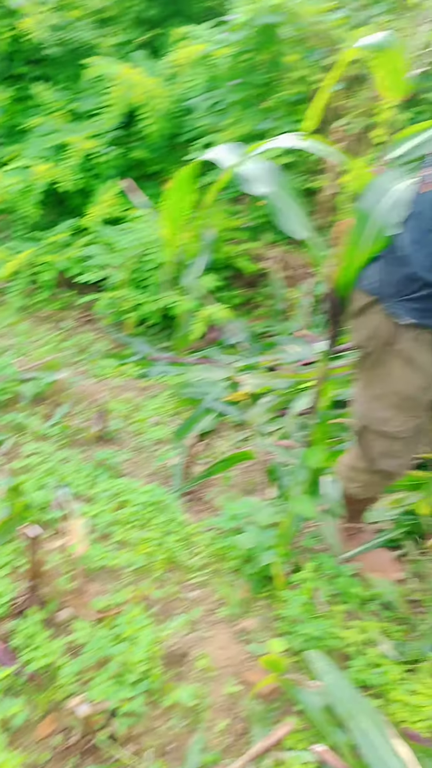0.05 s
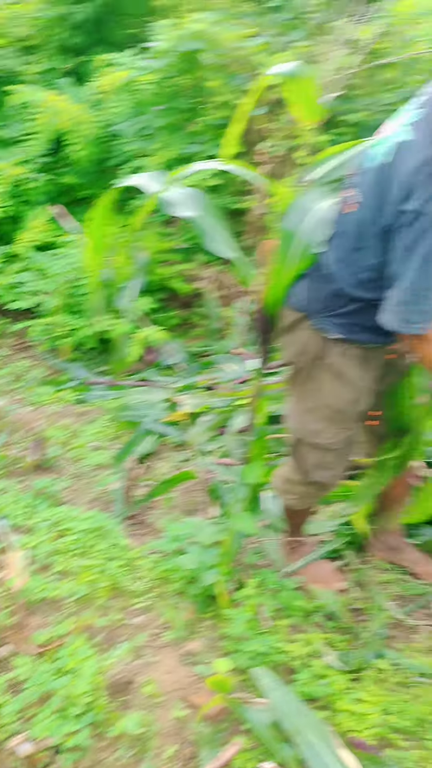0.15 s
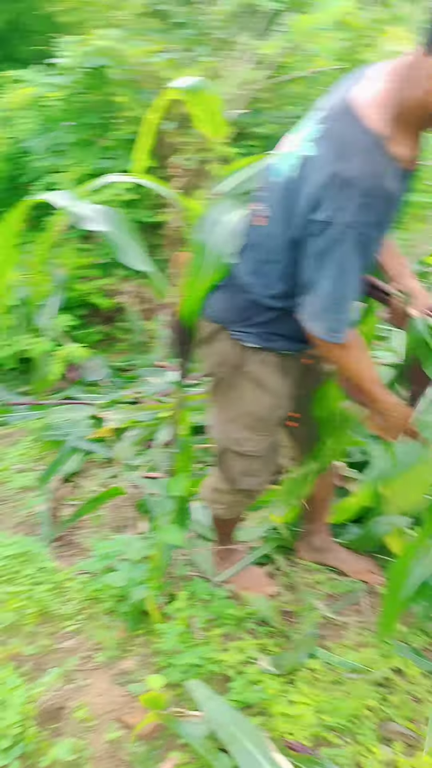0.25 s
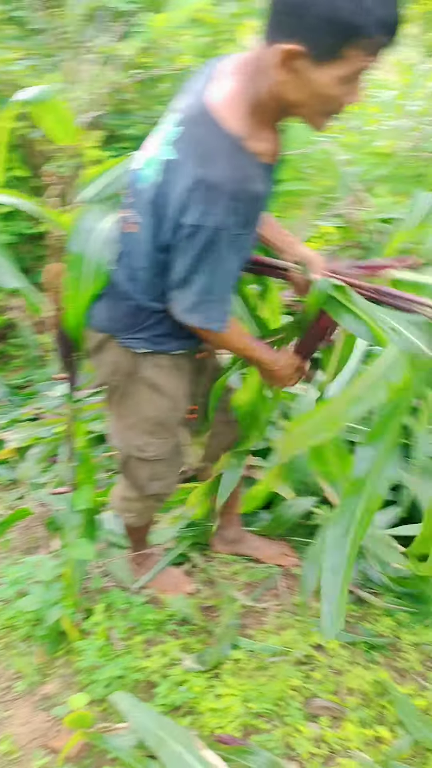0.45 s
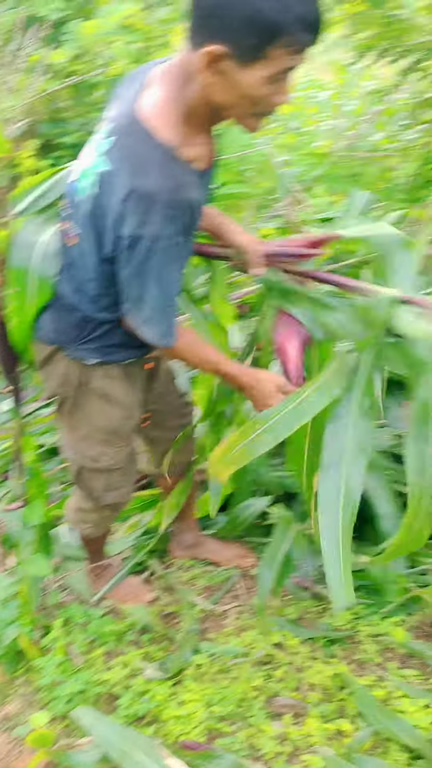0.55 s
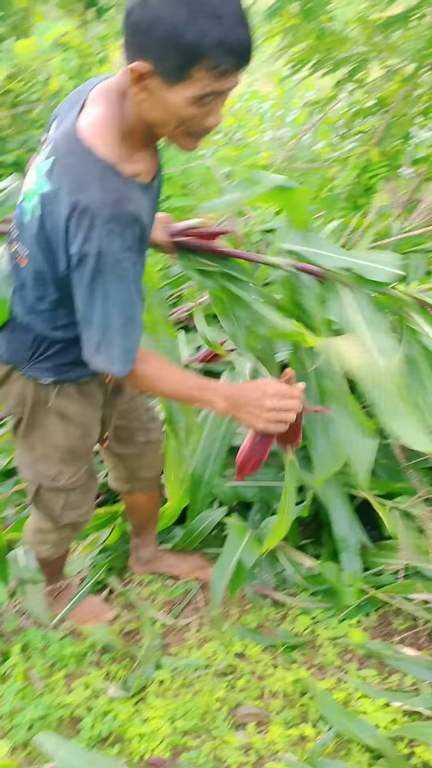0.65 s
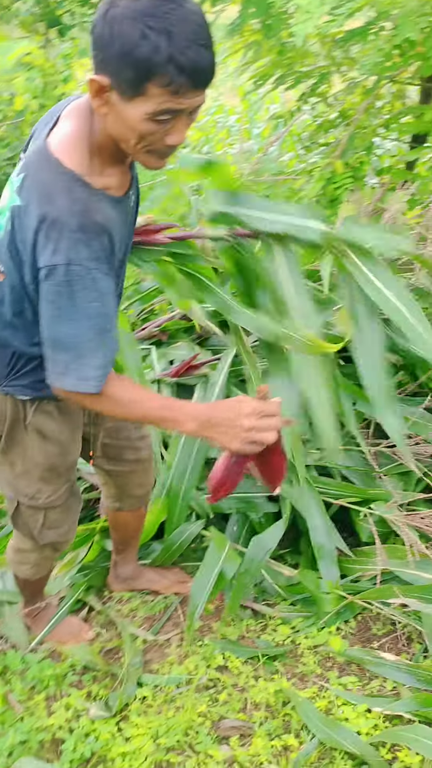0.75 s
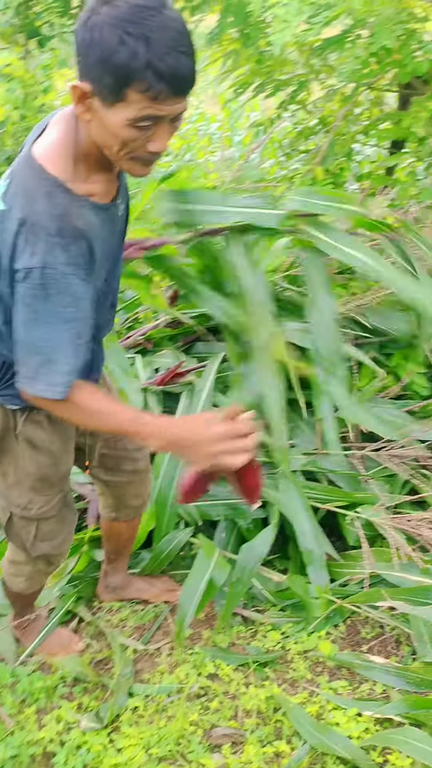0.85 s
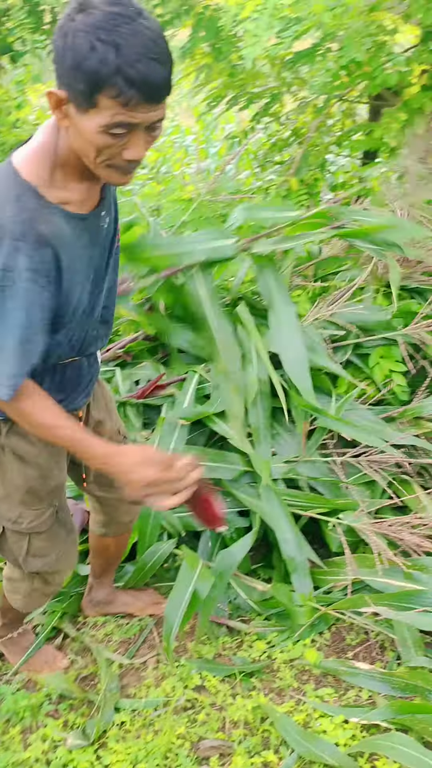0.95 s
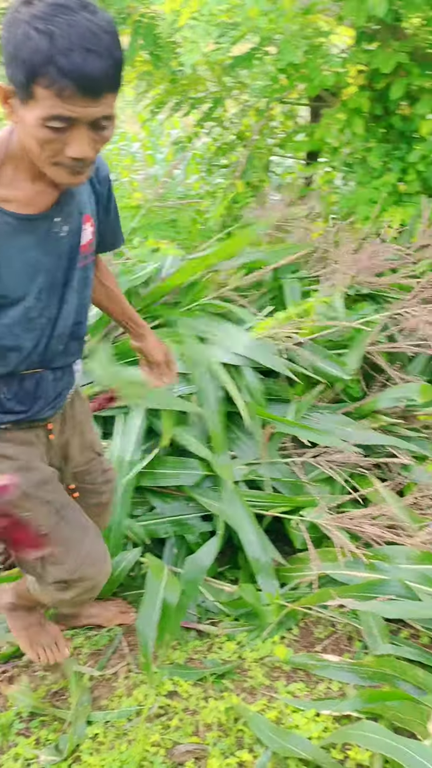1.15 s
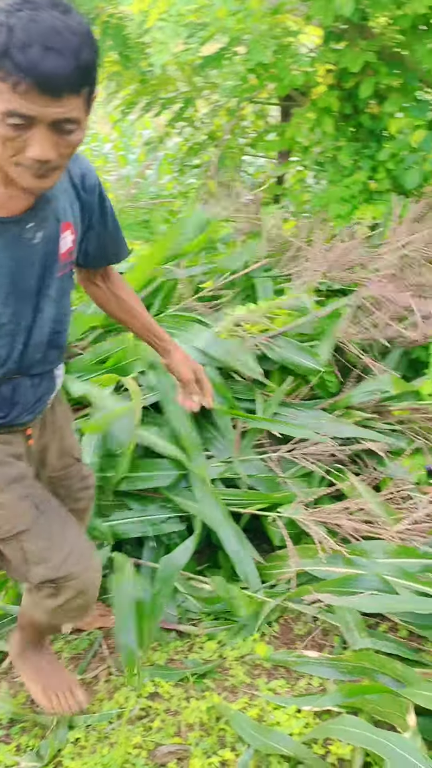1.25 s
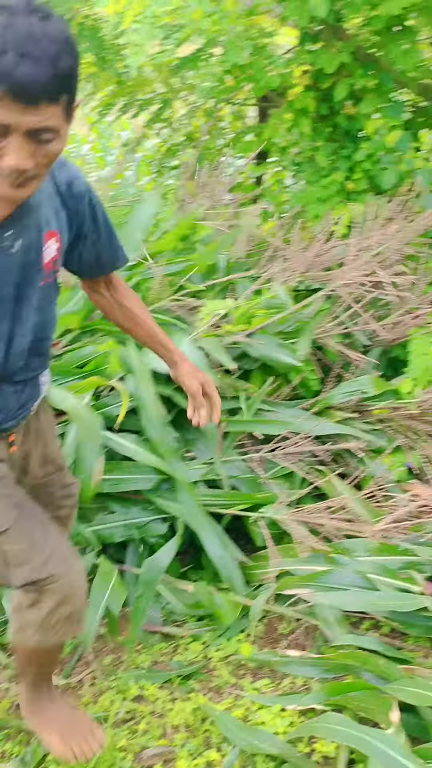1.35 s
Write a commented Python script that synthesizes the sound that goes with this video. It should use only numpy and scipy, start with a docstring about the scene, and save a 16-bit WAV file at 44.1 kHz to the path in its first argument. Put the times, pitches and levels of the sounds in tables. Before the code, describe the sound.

In an open field, a corn stalk snaps twice in quick succession and husk fibres rip. Leaves swish and crackle in uneven waves with light bumps, and a bare foot lands softly on soil near the end.

```python
"""Picking corn by hand

An ear breaks off its stalk with a double snap and the husk fibres tear. The leafy stalk is swung and
dropped on a heap: its leaves hiss by friction, crinkle by buckling and tick as their ribs collide.
Bare feet land on the soil. Faint hiss of the open field lies behind, and the microphone passes
little above 8 kHz."""
import sys
import numpy as np
from scipy import signal
from scipy.fft import rfft, irfft, next_fast_len
from scipy.io import wavfile
from scipy.ndimage import map_coordinates

SR = 44100
rng = np.random.default_rng(int(sys.argv[2]) if len(sys.argv) > 2 else 0)


def put_to_file(sound):
    """Save the sound as 16-bit audio at rate SR, in the file named by the first command-line argument."""
    columns = np.atleast_2d(sound).T  # one column per channel
    safe = np.clip(columns, -1, 1)
    whole_steps = np.round(safe * 32767)
    wavfile.write(sys.argv[1], SR, whole_steps.astype(np.int16))


N = 61739
T = np.arange(N) / SR
TOP_HZ = 8520


def amp(db):
    """Amplitude ratio of a level in decibels."""
    return 10 ** (np.asarray(db) / 20)


def unit(x):
    """Normalisation to rms 1."""
    return x / np.sqrt(np.mean(x ** 2) + 1e-20)


def filtered(x, response):
    """Linear filtering: the spectrum of x is multiplied by a frequency response."""
    size = next_fast_len(N + 8192)
    return irfft(rfft(x, size) * response(np.fft.rfftfreq(size, 1 / SR)), size)[:N]


def coloured(x, spectrum):
    """Spectral shaping by a curve of (f/Hz, level/dB) points, cut off at TOP_HZ."""
    f, db = np.transpose(spectrum)
    return filtered(x, lambda hz: amp(np.interp(np.log(hz + 1), np.log(f), db)) * (hz < TOP_HZ))


def noise(spectrum):
    """Spectrally shaped Gaussian noise of rms 1."""
    return unit(coloured(rng.standard_normal(N), spectrum))


def resonance(centre_hz, width_oct, skirt_db):
    """A broad resonance: wandering phase at nearly even amplitude gives a rough ring of rms 1."""
    def shape(hz):
        octaves = np.log2((hz + 1) / centre_hz)
        peak = np.exp(-.5 * (octaves / width_oct) ** 2)
        skirt = amp(skirt_db) * np.exp(-.5 * (octaves / 1.6) ** 2)
        return (peak + skirt) * (hz < TOP_HZ)
    band = filtered(rng.standard_normal(N), shape)
    phase = np.angle(signal.hilbert(band, next_fast_len(N))[:N])
    return unit(filtered(np.cos(phase), lambda hz: np.sqrt(shape(hz))))


def burst(start_s, attack_s, decay_s):
    """Envelope of a damped transient: quick rise, exponential decay."""
    t = np.maximum(T - start_s, 0)
    return (1 - np.exp(-t / attack_s)) * np.exp(-t / decay_s)


def grains(per_s, centre_hz, spread, cycles, scatter_db):
    """Shot noise of rms 1: tiny damped oscillations of random onset, frequency and size."""
    onset, pitch_a, pitch_b, chance = rng.random((int(per_s * N / SR), 4)).T[:, :, None]
    hz = np.clip(centre_hz * np.exp(spread * (pitch_a + pitch_b - 1)), 40, TOP_HZ)
    size = amp(-scatter_db * np.log(np.maximum(chance, np.exp(-4))))
    age = np.arange(SR // 100)
    rings = size * np.sin(2 * np.pi * hz * age / SR) * np.exp(-hz * age / SR / cycles)
    at = (onset * N).astype(int) + age
    return unit(np.bincount(at.ravel(), rings.ravel(), N)[:N])


# Spectrum of the field's background: f/Hz, level/dB
FIELD_SPECTRUM = [(25, -12), (70, -15), (125, 4.5), (240, -11.5), (550, 2), (900, -2.5), (1400, -3),
                  (2400, 5), (4500, -4.5), (6500, -10.5), (8000, -15.5)]

def field_hiss():
    """Ambient noise: a faint, stationary broadband floor."""
    return amp(-53) * noise(FIELD_SPECTRUM)


# Spectrum of leaf friction: f/Hz, level/dB
SLIDE_SPECTRUM = [(500, -33), (2000, -16.5), (3000, -6), (3900, -6.5), (4900, -6), (5700, -2.5), (6500, 1),
                  (7400, -4.5), (8200, -4)]

def sliding():
    """Friction: dense tiny slips of leaf on leaf merge into a hiss."""
    slips = grains(per_s=3500, centre_hz=5650, spread=0.77, cycles=1.3, scatter_db=0)
    return unit(unit(coloured(slips, SLIDE_SPECTRUM)) + noise(SLIDE_SPECTRUM))


# Spectrum of buckling leaves: f/Hz, level/dB
CRINKLE_SPECTRUM = [(200, -39.5), (700, -10.5), (1150, -5.5), (1600, -1), (1900, -2.5), (2300, 0.5),
                    (2900, 0), (3700, -5.5), (6000, -21)]

def crinkling():
    """Buckling: leaves give way in small clicks over a bed of noise."""
    clicks = grains(per_s=900, centre_hz=2254, spread=0.907, cycles=1.9, scatter_db=3.5)
    return unit(unit(coloured(clicks, CRINKLE_SPECTRUM)) + amp(3.5) * noise(CRINKLE_SPECTRUM))


# Spectrum of flapping leaves: f/Hz, level/dB
FLAP_SPECTRUM = [(25, -33.5), (60, -18), (90, -9.5), (130, -3), (190, -5), (320, -2.5), (600, -3.5),
                 (1000, -4.5), (2000, -19.5)]

def flapping():
    """Radiation from moving surfaces: flapping leaves give low pats and noise."""
    pats = grains(per_s=250, centre_hz=449, spread=1.25, cycles=1.8, scatter_db=4)
    return unit(unit(coloured(pats, FLAP_SPECTRUM)) + noise(FLAP_SPECTRUM))


# Course of the leaf movement: t/s, hiss level/dB, crinkle level/dB
LEAF_MOTION = [(0, -48, -52), (.16, -49, -48), (0.209, -43, -47), (0.258, -33.5, -34.5),
               (0.309, -42.5, -47), (0.348, -39, -37), (0.419, -44, -53), (0.478, -37, -38),
               (.56, -37, -42), (0.661, -44.5, -44.5), (.705, -49, -54.5), (0.734, -40, -42.5),
               (0.862, -37, -41.5), (.97, -42, -45), (1.04, -41, -42), (1.13, -37, -40), (1.2, -34, -38),
               (1.291, -44, -45.5), (1.39, -50, -56.5)]
FLAP_DB, FLAP_FOLLOWS_CRINKLE = -54, 0.83
CATCH_DB, CATCH_KNOTS_PER_S = 1.21, 110

def leaves():
    """Stick-slip modulation: the three leaf sounds waver together as the leaves catch and slip."""
    times, hiss_db, crinkle_db = np.transpose(LEAF_MOTION)
    hiss_db, crinkle_db = np.interp(T, times, hiss_db), np.interp(T, times, crinkle_db)
    flap_db = FLAP_DB + FLAP_FOLLOWS_CRINKLE * (crinkle_db - crinkle_db.mean())
    catch = map_coordinates(rng.standard_normal(1024), [T * CATCH_KNOTS_PER_S], mode="wrap")
    rustle = amp(hiss_db) * sliding() + amp(crinkle_db) * crinkling() + amp(flap_db) * flapping()
    return amp(CATCH_DB * catch) * rustle


# Impacts of leaf ribs and husks: t/s, level/dB, f/Hz, decay time/s, width/octaves
RIB_TICKS = [(0.1741, -30.5, 2920, 0.0032, 0.27), (0.1745, -29.5, 6000, 0.0038, 0.095),
             (0.195, -38, 2600, 0.0012, .25), (.2775, -17, 2310, 0.0009, 0.23),
             (.2825, -21, 2570, .001, .25), (0.2915, -30, 2260, 0.0021, 0.22),
             (0.3096, -29.5, 2330, 0.0022, 0.13), (0.34, -26.5, 1720, 0.0041, 0.24),
             (0.3415, -29, 5840, 0.011, 0.95), (0.4682, -25.5, 5550, 0.0038, 0.8),
             (0.472, -23, 1760, 0.002, 0.22), (0.6269, -24.5, 2180, 0.0015, 1),
             (0.7935, -25.5, 1365, .0022, 0.26), (0.845, -29.5, 2700, 0.0033, 0.45),
             (.893, -25, 2360, .0015, 0.25), (1.0625, -28, 2255, 0.0048, 0.06),
             (1.067, -26.5, 4500, 0.0036, 0.8), (1.108, -29.5, 5900, 0.0036, 0.17),
             (1.161, -27.5, 5600, .003, 0.29)]

def ticks():
    """Impact excitation: stiff ribs and husks flick against each other and ring briefly."""
    return sum(amp(db) * burst(start, 0.00035, decay) * resonance(hz, width, skirt_db=-25)
               for start, db, hz, decay, width in RIB_TICKS)


# Bumps of stalk and ear: t/s, level/dB, f/Hz, decay time/s
STALK_KNOCKS = [(0.175, -35, 396, 0.0054), (.234, -27.5, 430, 0.0076), (0.237, -43, 140, .015),
                (0.489, -47.5, 292, 0.073), (0.536, -45.5, 134, 0.019), (0.757, -43, 1110, 0.0032),
                (0.842, -46.5, 700, 0.0071), (1.063, -40.5, 260, 0.0045), (1.182, -38, 400, 0.0039)]
KNOCK_HIGHPASS_HZ = 70

def knocks():
    """Heavy damping: stalk and ear recoil and bump with hardly any ring and no deep bass."""
    bumps = sum(amp(db) * burst(start, .001, decay) * resonance(hz, width_oct=0.63, skirt_db=-37)
                for start, db, hz, decay in STALK_KNOCKS)
    return filtered(bumps, lambda hz: hz ** 4 / (hz ** 4 + KNOCK_HIGHPASS_HZ ** 4))


# Breaks of the stalk: t/s, level/dB, f/Hz at the peak, rise time/s, relative splinter level/dB
STALK_BREAKS = [(.2206, -14, 2450, .0005, -11), (.2341, -5.3, 2400, .00075, -18.5)]
# Spectrum of splintering fibres: f/Hz, level/dB
SPLINTER_SPECTRUM = [(300, -24), (1100, -13.5), (1750, -2), (2300, 1), (2900, 1.5), (3700, -5.5),
                     (5000, -8.5), (6600, -4), (8000, -16.5)]
SNAP_RISE_HZ_PER_S = 330000

def snaps():
    """Brittle fracture: each break gives a rising ring of a few cycles, then a spray of splinters."""
    out = np.zeros(N)
    for start, db, hz, peak_s, splinter_db in STALK_BREAKS:
        t = np.maximum(T - start, 0)
        rise = t / peak_s
        turns = hz * t + SNAP_RISE_HZ_PER_S * (t / 2 - peak_s) * t
        ring = rise * np.exp((1 - rise ** 2) / 2) * np.sin(2 * np.pi * turns)
        spray = burst(start, 0.00021, 0.0036) + amp(1.5) * burst(start, 0.00065, 0.0049)
        out += amp(db) * (ring + amp(splinter_db) * spray * noise(SPLINTER_SPECTRUM))
    return out


# Spectrum of parting husk fibres: f/Hz, level/dB
HUSK_SPECTRUM = [(40, -36), (300, -15), (1100, -3.5), (1750, -3), (2800, -4), (4000, -7), (8000, -5)]
TEAR_START_S, TEAR_END_S, TEAR_RELEASE_S, TEAR_DB = .239, .271, .009, -33.5

def tear():
    """Progressive failure: after the break the husk fibres part one by one, each with a click."""
    release = np.exp(-np.maximum(T - TEAR_END_S, 0) / TEAR_RELEASE_S)
    envelope = burst(TEAR_START_S, attack_s=0.00081, decay_s=.3) * release
    fibres = grains(per_s=2200, centre_hz=2280, spread=0.29, cycles=1.1, scatter_db=1.2)
    return amp(TEAR_DB) * envelope * unit(coloured(fibres, HUSK_SPECTRUM))


# Bare footfalls: t/s, level/dB, Gaussian half-width/s, low-pass cutoff f/Hz
FOOTFALLS = [(1.192, -45, 0.029, 1110), (1.383, -59.5, 0.035, 160)]
# Spectrum of trodden soil: f/Hz, level/dB
SOIL_SPECTRUM = [(12, -30), (28, -14.5), (60, -5.5), (130, -3.5), (380, -7), (800, -9.5), (1400, -25),
                 (3000, -57)]

def steps():
    """Soft impact: a bare foot presses into soil and weeds; the lighter step is duller."""
    out = np.zeros(N)
    for centre, db, half_width, cutoff_hz in FOOTFALLS:
        soil = unit(filtered(noise(SOIL_SPECTRUM), lambda hz: 1 / (1 + (hz / cutoff_hz) ** 4)))
        pressure = np.exp(-.5 * ((T - centre) / half_width) ** 2)
        out += amp(db) * pressure * soil
    return out


def scene():
    """Superposition in a free field: all sources add in one channel, without reflections."""
    return (field_hiss() + leaves() + ticks() + knocks() + snaps() + tear() + steps())[None]


# Frequency response of the microphone: f/Hz, level/dB
MICROPHONE_RESPONSE = [(20, -4), (7200, 0.5), (7650, -2.5), (8000, -16), (8400, -27), (8600, -47)]

def record(dry):
    """Band limiting: the microphone rolls off steeply near 8 kHz."""
    return np.array([coloured(x, MICROPHONE_RESPONSE) for x in dry])


dry = scene()
out = record(dry)
put_to_file(out)
```